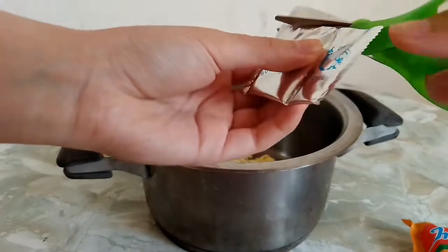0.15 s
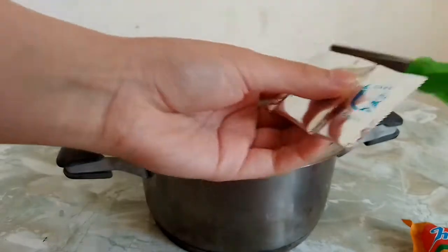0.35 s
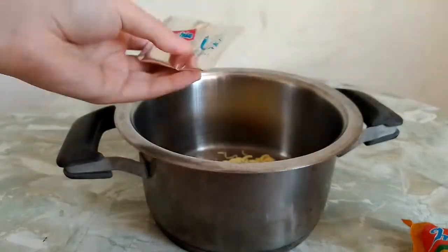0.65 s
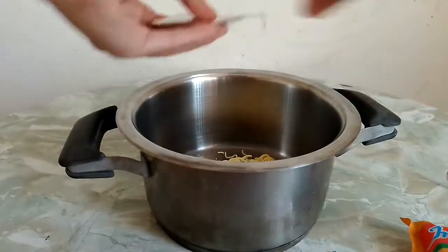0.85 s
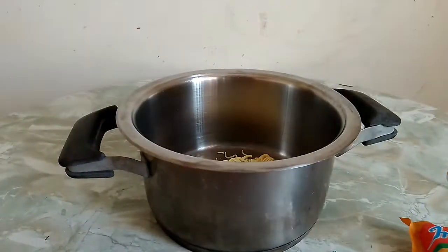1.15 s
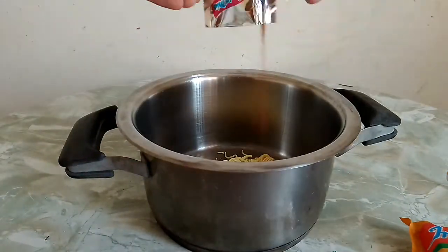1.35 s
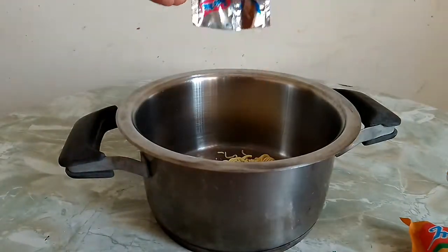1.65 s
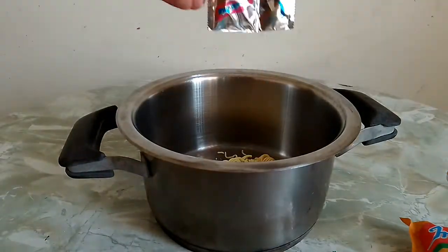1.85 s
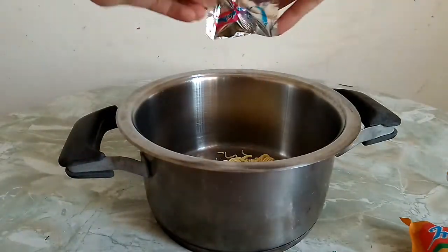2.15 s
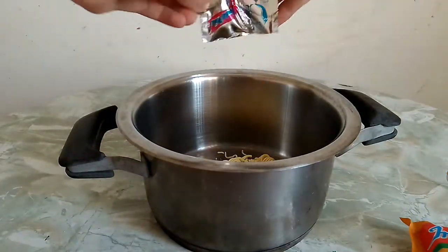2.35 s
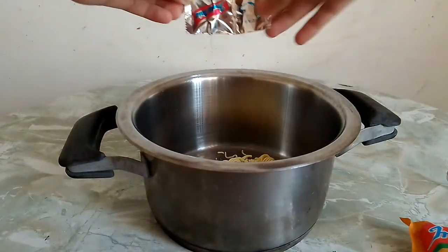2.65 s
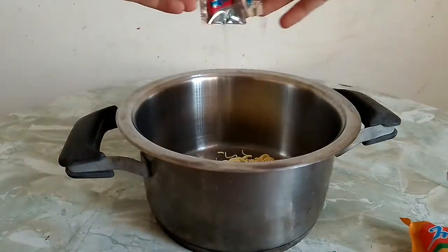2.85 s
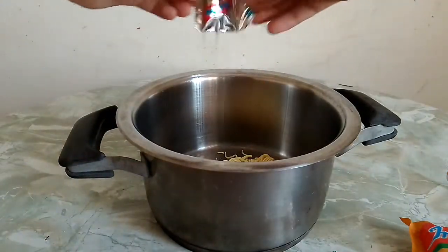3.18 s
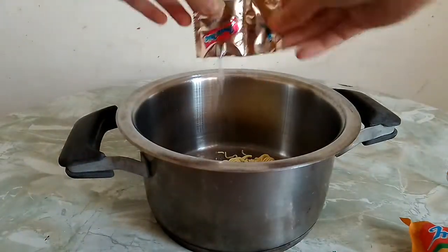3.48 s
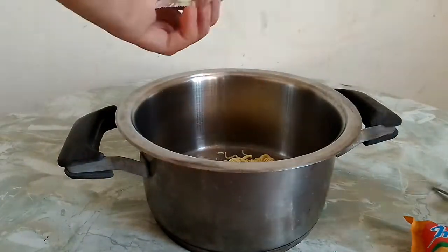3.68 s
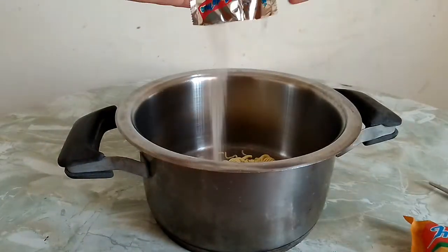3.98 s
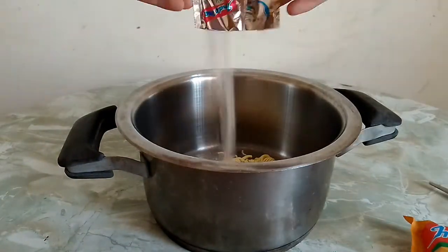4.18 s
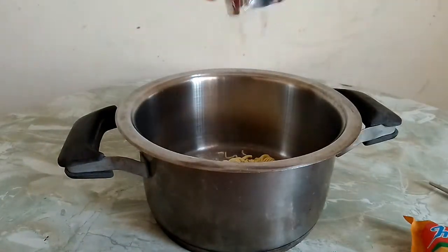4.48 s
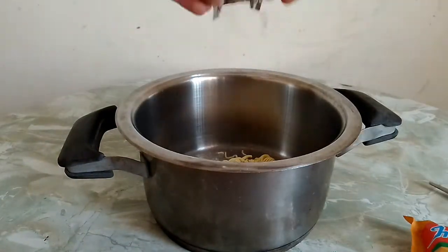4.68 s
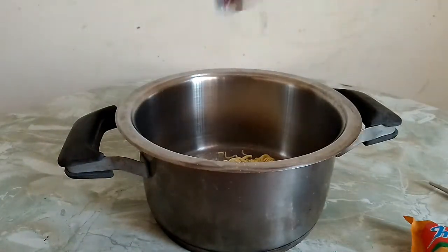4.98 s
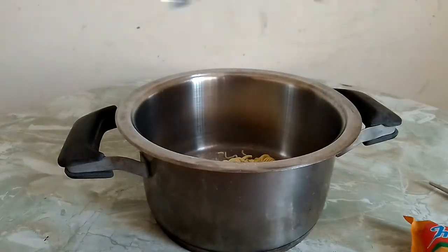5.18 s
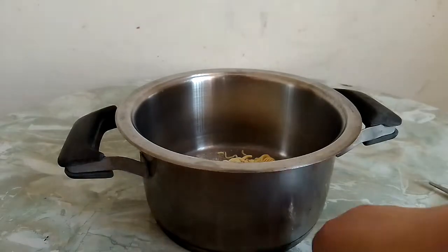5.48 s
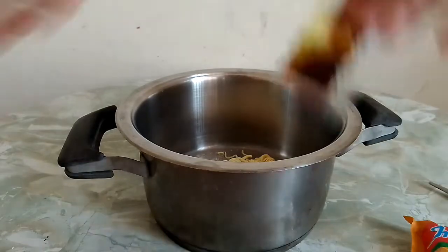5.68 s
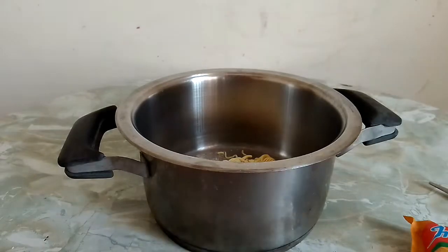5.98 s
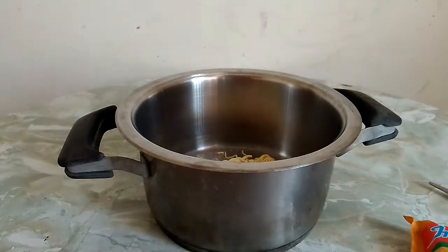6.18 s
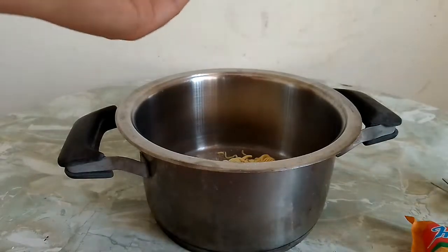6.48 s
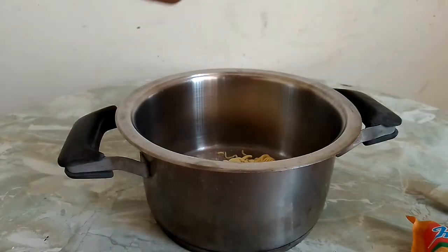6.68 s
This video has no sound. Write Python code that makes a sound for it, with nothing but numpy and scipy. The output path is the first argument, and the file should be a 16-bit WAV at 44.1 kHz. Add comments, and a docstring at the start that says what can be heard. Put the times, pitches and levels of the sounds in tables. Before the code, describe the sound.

Bright, brittle foil film buckles in dry snaps over fine crackle, in a small kitchen with almost no echo. Scissors cut and ring faintly, objects tap and scrape the table, and the crinkling comes in bursts. After a cluster of hard knocks and a tiny dropout, vigorous shaking peaks close to the microphone, clipping slightly. Then muffled, unsteady background noise, isolated faint ticks and soft table touches.

```python
"""Stiff foil film buckles in short snaps over a finer crackle, close to a phone on a kitchen table.
Sachets are snipped, squeezed and shaken out over a steel pot: creases strike resonances of the film.
Scissors and sachets are put down: knocks and gritty noise ring the table's modes, and the blades ring once.
Dull background noise lies underneath, turned up and down as by the recorder's noise suppressor;
the sound drops out for a moment."""
import sys
import numpy as np
from scipy import signal
from scipy.fft import rfft, irfft
from scipy.io import wavfile
from scipy.ndimage import uniform_filter1d

SR = 44100
rng = np.random.default_rng(int(sys.argv[2]) if len(sys.argv) > 2 else 0)


def transcribe(u):
    """Save the signal u as a 16-bit wav file named by the first command-line argument.

    u: samples, shape (n,) or (channels, n), limited to [-1, 1]; the rate is SR.
    q: integer samples, one column per channel.
    """
    v = np.clip(np.atleast_2d(u).T, -1, 1)
    q = np.round(v * 32767).astype(np.int16)
    wavfile.write(sys.argv[1], SR, q)


N = 301644
TIME = np.arange(N) / SR  # s

# background noise under the handling, turned up and down by the recorder's noise suppressor:
# t/s, rms level/dB
BACKGROUND_LEVEL = [(0.0, -60.5), (0.369, -58), (0.519, -60), (0.619, -73), (0.888, -58), (1.956, -61.5),
                    (2.564, -59), (3.293, -58.5), (4.939, -52.5), (5.378, -62.5), (5.587, -57),
                    (5.777, -76), (5.986, -56.5), (6.116, -72.5), (6.366, -71.5), (6.834, -51.5)]
# spectrum of that noise: f/Hz, relative density/dB per Hz
BACKGROUND_SPECTRUM = [(80, -12), (130, -1.5), (270, -1), (420, -9.5), (520, -4.5), (1100, -11),
                       (1350, -27), (5300, -38), (9300, -25.5), (16000, -51)]
# spectrum of the low rumble: f/Hz, relative density/dB per Hz
RUMBLE_SPECTRUM = [(20, -3), (60, -6), (110, -16), (200, -46)]
RUMBLE_DB = -58  # rms

# the hands work the film: start t/s, length/s, treble crackle rms at start/dB, at end/dB,
# broad panels against that crackle/dB
SQUEEZES = [(0.046, 0.012, -28, -30.5, -8.5), (0.171, 0.025, -32, -45.5, -14), (0.298, 0.016, -44, -57, -7),
            (0.67, 0.078, -42.5, -26.5, -12.5), (1.218, 0.23, -56, -40.5, -17.5),
            (1.599, 0.041, -31, -56, -12), (1.745, 0.0097, -30.5, -42.5, -10),
            (1.978, 0.22, -46.5, -29.5, -7.5), (2.246, 0.2, -45.5, -68, -10), (2.342, 0.26, -48.5, -32, -2),
            (2.836, 0.14, -41.5, -32.5, -4), (3.021, 0.11, -20.5, -44, -4.5), (3.157, 0.23, -22, -50, -5),
            (3.433, 0.089, -42.5, -52, -6.5), (3.717, 0.064, -20, -22.5, -2),
            (3.888, 0.18, -36.5, -68.5, -11), (4.031, 0.31, -35.5, -53, -12.5),
            (4.213, 0.51, -33.5, -43.5, -7.5), (4.47, 0.22, -36, -38, -9.5), (4.72, 0.21, -36, -27, -5.5),
            (4.964, 0.027, -20.5, -29.5, -3), (5.032, 0.014, -18.5, -19, -5),
            (5.093, 0.11, -30, -34.5, -5.5), (6.414, 0.017, -24, -56, -2.5), (6.462, 0.018, -28, -36, -8),
            (6.546, 0.068, -39, -63, -8.5), (6.799, 0.058, -57, -44, -20)]
GRIP_DB_PER_S, RELEASE_DB_PER_S = 2500, 603.5  # a squeeze sets in at once and dies away more slowly
# the film buckles: t/s, treble peak level/dB, peak of the broad panels against the treble/dB
SNAPS = [(0.0966, -20.5, -3.5), (0.2183, -28, -16), (0.2604, -27.5, -17), (0.3017, -7.5, -11.5),
         (0.395, -27, -16), (0.699, -12, -14.5), (0.751, -6, -21.5), (0.825, -31, -24),
         (0.936, -34.5, -6.5), (1.2266, -17.5, -5), (1.244, -21, -10), (1.28, -15.5, -10.5),
         (1.3869, -14, -18), (1.438, -20, -14), (1.4724, -3.5, -14), (1.4755, -10, -17),
         (1.4955, -7.5, -32), (1.5034, -4, -10), (1.604, -31, -10), (1.635, -25, -14), (1.763, -18, -5.5),
         (2.048, -14, -13), (2.176, -20, 8.5), (2.155, -14, -5), (2.1816, -11, -42), (2.3996, -12, -13.5),
         (2.42, -22, -4), (2.436, -6.5, -7), (2.461, -7, -5.5), (2.4896, -13, -3.5), (2.537, -3.5, -13.5),
         (2.538, -10.5, 7.5), (2.566, -7, -3.5), (2.5854, -5.5, 1), (2.64, -8.5, -5), (2.681, -16, -4.5),
         (2.7394, -30, -5), (2.842, -13.5, -6.5), (2.941, 0.5, -9), (2.96, -24, 5), (3.0206, -8.5, -48),
         (3.0978, -6.5, -8), (3.1425, -10, -44), (3.1904, -1, -12.5), (3.23, -7.5, -42), (3.258, -6, -6),
         (3.2934, -10, -40), (3.3209, -18, -0.5), (3.358, -17.5, -18), (3.692, 0.5, -4.5),
         (3.7566, -6.5, -28), (3.783, -9, -11.5), (4.035, -5, -23), (4.073, -13, -15),
         (4.1571, -4.5, -10.5), (4.163, -8.5, -9), (4.2224, 3, -13.5), (4.2333, -12, -24), (4.263, -4, -3),
         (4.332, -1.5, -49.5), (4.3638, -6.5, -0.5), (4.3723, 0.5, -11.5), (4.3841, -2, -28.5),
         (4.4015, -22.5, -27), (4.436, -12, -50.5), (4.4545, -16.5, -18), (4.495, -12, -35),
         (4.547, -10, -3.5), (4.556, -22, -28), (4.5721, -1, -33.5), (4.5887, -2, -8), (4.6181, 5, -16),
         (4.64, -13, -22), (4.665, -15.5, -25.5), (4.674, -6.5, -22), (4.686, 1, -5), (4.694, 3, -52.5),
         (4.746, -3.5, -49.5), (4.758, 3, -6), (4.772, -12, -26), (4.8005, -4, -5.5), (4.812, -6, -28.5),
         (4.8334, -2.5, -7.5), (4.844, -2, -12), (4.8794, -6, -6.5), (4.8857, 4, -10.5), (4.912, -9, -1),
         (4.923, 4, -7.5), (4.959, -6.5, -7), (4.968, 0, -6), (4.98, -14.5, -35), (4.994, -9, -17),
         (5.004, 1.5, -5.5), (5.006, 1, -11.5), (5.06, -2, -5), (5.0668, -6.5, -21), (5.1392, -26, -6),
         (5.1486, -16, -15), (5.1713, -36, -20), (5.191, -5, -7.5), (5.3654, -32, -4.5), (5.524, -27, -5),
         (5.692, -42, -6), (6.04, -43, 2), (6.6928, -22.5, -12), (6.8131, -22, -36), (6.8395, -18, -25)]
BEFORE_DB, BEFORE_DB_PER_S = -35, 1999  # crackle as strain builds: level against the snap, rise
AFTER_DB, AFTER_DB_PER_S = -33, 496.5  # neighbouring folds crackle on: level against the snap, fall
HELD_DB = -72  # faint crackle of film merely held
PANELS_DB = -6  # broad panels against the crackle when held and around snaps
# one click of film as the close phone hears it, port resonance near 9 kHz included:
# f/Hz, relative density/dB per Hz
FILM_SPECTRUM = [(400, -24), (1050, -21), (1550, -22.5), (2300, -23), (3000, -13.5), (3600, -9),
                 (4330, -12), (4850, -9.5), (5600, -8), (9100, 8), (11200, -4.5), (13200, -9.5),
                 (16000, -21)]
PANELS_HZ = 5375  # below this the broad panels sound
# the sachet's flat faces ring briefly: nominal f/Hz, width/Hz, nominal level/dB
FACES = [(1180, 120, -3), (1618, 170, -12.5), (3144, 150, -5), (4390, 80, -0.5)]
FACE_SPREAD_DB = 5  # each crease feeds the faces differently

# things touch the table: t/s, peak level/dB, hardness/dB per octave
KNOCKS = [(0.049, -37.5, 4), (0.301, -40, 13), (0.666, -41, -12.5), (0.701, -18.5, 39.5),
          (0.713, -26, 44.5), (0.7515, -16.5, 30.5), (0.777, -31.5, 27), (3.691, -11, 0),
          (3.714, -22.5, 10), (3.729, -19.5, -12.5), (3.756, -18, 6), (3.7695, -13, 4), (3.783, -23.5, 4),
          (3.7901, -19, 4), (5.52, -42.5, 3.5), (6.412, -32.5, 11.5), (6.481, -22, -1.5),
          (6.563, -33.5, -8), (6.812, -33, 19), (6.837, -25, 4)]
# things slide over the table: start t/s, length/s, rms at start/dB, at end/dB, hardness/dB per octave
DRAGS = [(0.677, 0.12, -40, -54.5, 12), (3.71, 0.085, -35, -35, 9.5), (3.829, 0.036, -36.5, -55, -17),
         (6.409, 0.045, -38.5, -51, 0), (6.471, 0.015, -42, -42.5, 6), (6.538, 0.064, -45.5, -50, -6),
         (6.718, 0.023, -49, -47.5, -14), (6.795, 0.06, -44.5, -50, -7.5)]
TOUCH_DB_PER_S, LIFT_DB_PER_S = 4000, 543.5  # a slide starts at once and dies away more slowly
# modes of the table top: nominal f/Hz, width/Hz, nominal level/dB
TABLE_MODES = [(318, 42, 1), (415, 40, -7), (513, 37, -3.5), (800, 100, -13), (980, 120, 3),
               (1110, 180, -8.5), (1830, 660, -5), (2600, 940, -20)]
# modes of the scissor blades: f/Hz, relative level/dB, time to fall 60 dB/s
BLADE_MODES = [(906, -27.5, 0.34), (994, -28.5, 0.23), (2380, -22.5, 0.12), (2767, -26, 0.046),
               (2840, -31, 0.18), (4760, -36, 0.08), (6331, -38, 0.11), (8400, -4.5, 0.031),
               (9470, 1, 0.036), (11300, -12, 0.025)]
BLADES_S, BLADES_DB = 0.3324, -26.5  # start, peak level

# the recorder's resting voltage drifts: t/s, fraction of full scale
RESTING_VOLTAGE = [(0, .019), (2.2, .017), (2.45, .024), (5.2, .023), (5.5, .014), (6.84, .024)]
# the sound drops out briefly: t/s, gain/linear
DROPOUT = [(3.61, 1), (3.6101, 0), (3.624, 0), (3.632, .1), (3.639, 1)]
EDGE_HZ = 16200  # upper band limit


def amp(db):
    """Gain of a level in dB."""
    return 10 ** (np.asarray(db) / 20)


def evened(x):
    """Scaled to rms 1."""
    return x / np.sqrt(np.mean(x ** 2) + 1e-20)


def follow(rows):
    """A curve over time, straight between its points."""
    return np.interp(TIME, *np.transpose(rows))


def read(points, hz):
    """A spectrum in dB, read between its points on a log frequency axis."""
    f, db = np.transpose(points)
    return np.interp(np.log(hz + 1), np.log(f + 1), db)


def add(mix, s, sound):
    """Mixes a sound in at a time in s."""
    part = mix[round(s * SR):][:len(sound)]
    part += sound[:len(part)]


def gesture(start, length, first_db, last_db, rise_db, fall_db):
    """Gain of one move of the hand: quick onset, even swell or fade, release (slopes in dB per s)."""
    db = np.interp(TIME, [start, start + length], [first_db, last_db])
    early = np.maximum(start - TIME, 0)
    late = np.maximum(TIME - start - length, 0)
    return amp(db - rise_db * early - fall_db * late)


def resonate(x, hz, width):
    """A two-pole resonance of gain about 1 at its peak."""
    r = np.exp(-np.pi * width / SR)
    turn = 2 * np.pi * hz / SR
    return signal.lfilter([2 * (1 - r) * np.sin(turn)], [1, -2 * r * np.cos(turn), r * r], x)


def coloured(points):
    """Steady noise of rms 1 with a given spectrum."""
    gain = amp(read(points, np.fft.rfftfreq(N, 1 / SR)))
    return evened(irfft(rfft(rng.standard_normal(N)) * gain, N))


def background():
    """Shaped background noise whose level the noise suppressor turns up and down, over steady low rumble."""
    noise = amp(follow(BACKGROUND_LEVEL)) * coloured(BACKGROUND_SPECTRUM)
    return noise + amp(RUMBLE_DB) * coloured(RUMBLE_SPECTRUM)


def causal(db_of, size=4096):
    """The minimum-phase response with the level db_of(hz): all of it comes after the click."""
    hz = abs(np.fft.fftfreq(size, 1 / SR))
    log_gain = np.log(amp(np.maximum(db_of(hz), -100)))
    return np.fft.ifft(np.exp(np.conj(signal.hilbert(log_gain)))).real[:size // 2]


def film_bands():
    """The film's response, split into treble and broad panels by slopes of 60 dB per decade."""
    slope_db = lambda hz: 60 * np.log10((hz + 1) / PANELS_HZ)
    treble = causal(lambda hz: read(FILM_SPECTRUM, hz) + np.minimum(slope_db(hz), 0))
    panels = causal(lambda hz: read(FILM_SPECTRUM, hz) - np.maximum(slope_db(hz), 0))
    return treble / np.linalg.norm(treble), panels / np.linalg.norm(panels)


def buckle(tail_db):
    """A crease gives way, smaller ones follow within a few ms, and film and pot ring on as noise."""
    t = np.arange(2600) / SR
    noise, chance = rng.standard_normal(len(t)), rng.random(len(t))
    follows = chance < 1000 / SR  # about 1000 per s
    jumps = (t == 0) + .4 * noise * np.exp(-t / .004) * follows
    tail = amp(tail_db - 60 * t / 0.048) * noise[::-1]
    drive = jumps + tail
    # each patch of film rings a few cycles at its own pitch
    sound = .1 * drive + resonate(drive, rng.uniform(6000, 11500), 2000)
    for hz, width, db in FACES:
        level_draw, pitch_draw = rng.standard_normal(2)
        face = resonate(drive, hz * (1 + .035 * pitch_draw), width)
        sound += amp(db + FACE_SPREAD_DB * level_draw) * face
    return sound


def shifting(x, patchy_db):
    """The folds keep moving, so broad patches of the spectrum swell and fade."""
    z = signal.stft(x, nperseg=256)[2]
    patches = uniform_filter1d(rng.standard_normal(z.shape), 7, axis=0)  # across frequency
    patches = uniform_filter1d(patches, 14, axis=1)  # across time
    return evened(signal.istft(z * amp(patchy_db * evened(patches)), nperseg=256)[1][:N])


def working():
    """Gains of treble and panel crackle: squeezes, run-up and wake of each snap, and mere holding."""
    kicks = np.zeros(N)
    for s, db, _ in SNAPS:
        add(kicks, s, amp([db]))
    wake = signal.lfilter([1], [1, -amp(-AFTER_DB_PER_S / SR)], kicks)
    run_up = signal.lfilter([1], [1, -amp(-BEFORE_DB_PER_S / SR)], kicks[::-1])[::-1]
    idle = amp(HELD_DB) + amp(AFTER_DB) * wake + amp(BEFORE_DB) * run_up
    moves = np.array([gesture(*row[:-1], GRIP_DB_PER_S, RELEASE_DB_PER_S) for row in SQUEEZES])
    panel_share = amp([row[-1] for row in SQUEEZES])
    return idle + moves.sum(0), amp(PANELS_DB) * idle + panel_share @ moves


def crackle(treble, panels):
    """Many small creases in clumps, a few much larger, over the hiss of powder sliding in the film."""
    swell = uniform_filter1d(uniform_filter1d(rng.standard_normal(N), 250), 250)
    clumps = amp(3.6 * evened(swell))
    size = amp(6.5 * np.minimum(rng.exponential(1, N), 2.1))
    creases = clumps * size * (rng.random(N) < 1000 / SR)  # about 1000 per s
    kind = rng.integers(0, 12, N)  # twelve different buckles, drawn at random
    drive = sum(signal.oaconvolve(creases * (kind == k), buckle(tail_db=-26.0))[:N] for k in range(12))
    powder = amp(-14.0) * clumps * rng.standard_normal(N)
    drive = shifting(evened(drive) + powder, patchy_db=3.5)
    high, low = (evened(signal.oaconvolve(drive, h)[:N]) for h in (treble, panels))
    high_gain, low_gain = working()
    return high_gain * high + low_gain * low


def table_ring(hardness_db):
    """The table top's modes; a harder touch feeds the upper ones more, each spot feeds them differently."""
    t = np.arange(4096) / SR
    ring = np.zeros(len(t))
    for hz, width, db in TABLE_MODES:
        spot_db, detune = rng.standard_normal(2) * [2, .018]  # detune is a share of pitch
        gain = amp(db + spot_db + hardness_db * np.log2(hz)) * np.sqrt(width)
        ring += gain * np.exp(-np.pi * width * t) * np.sin(2 * np.pi * hz * (1 + detune) * t)
    # a small top radiates no deep bass
    return signal.lfilter(*signal.butter(4, 245, "high", fs=SR), ring)


def table():
    """Knocks strike the table's modes; drags feed them with gritty noise."""
    out = np.zeros(N)
    t = np.arange(400) / SR
    for s, db, hardness_db in KNOCKS:
        push = 0.12 * rng.standard_normal(len(t)) * np.exp(-t / 0.0044)  # the thing settles
        push[0] = 1
        # the touch takes a moment, a soft one longer
        push = np.convolve(push, np.hanning(24 if hardness_db < 4 else 12))
        blow = signal.fftconvolve(push, table_ring(hardness_db))
        add(out, s, amp(db) * blow / abs(blow).max())
    grit = rng.standard_normal(N) * amp(5.0 * np.minimum(rng.exponential(1, N), 6))
    for *move, hardness_db in DRAGS:
        slide = evened(signal.oaconvolve(grit, table_ring(hardness_db))[:N])
        out += gesture(*move, TOUCH_DB_PER_S, LIFT_DB_PER_S) * slide
    return out


def snaps(treble, panels):
    """The loud creases: each one buckle, heard through the film's treble and its broad panels."""
    out = np.zeros(N)
    for s, db, panel_db in SNAPS:
        drive = buckle(tail_db=-29)
        high, low = (signal.fftconvolve(drive, h)[:len(drive)] for h in (treble, panels))
        rise_s = abs(high[:40]).argmax() / SR  # puts the first treble crest at the listed time
        snap = high / abs(high).max() + amp(panel_db) * low / abs(low).max()
        add(out, s - rise_s, amp(db) * snap)
    return out


def scissors():
    """The blades rub for a moment, which feeds their modes in a flutter, then ring out."""
    t = np.arange(SR // 4) / SR
    wobble = uniform_filter1d(rng.standard_normal((len(BLADE_MODES), len(t))), 150)
    flutter = 1 + 0.43 * evened(wobble)
    rub = np.hanning(1600) ** .5
    sound = np.zeros(len(t))
    for (hz, db, t60), flicker in zip(BLADE_MODES, flutter):
        swell = signal.fftconvolve(rub, amp(db - 60 * t / t60))[:len(t)]
        sound += swell * flicker * np.sin(2 * np.pi * (hz * t + rng.random()))
    out = np.zeros(N)
    add(out, BLADES_S, amp(BLADES_DB) * sound / abs(sound).max())
    return out


def scene():
    """Everything at the one microphone."""
    film = film_bands()
    return (background() + crackle(*film) + table() + snaps(*film) + scissors())[None]


def record(dry):
    """Resting voltage, the dropout, clipping at full scale, then the band limit."""
    wet = np.clip((dry + follow(RESTING_VOLTAGE)) * follow(DROPOUT), -1, 1)
    taps = signal.firwin(255, EDGE_HZ, window=("kaiser", 9), fs=SR)
    return signal.oaconvolve(wet, taps[None], "same")


dry = scene()
out = record(dry)
transcribe(out)
```